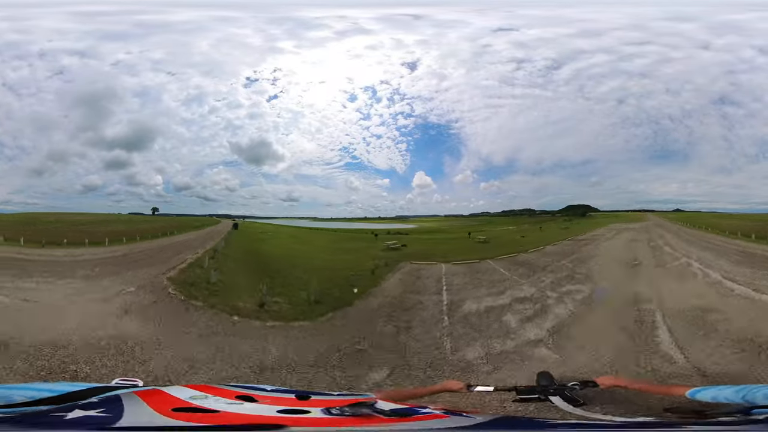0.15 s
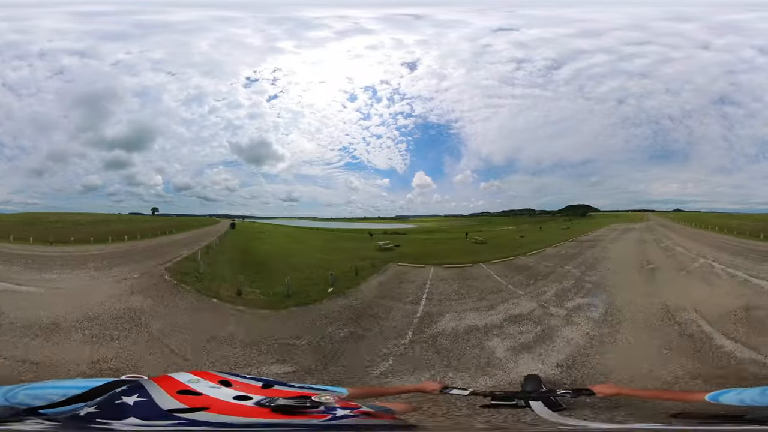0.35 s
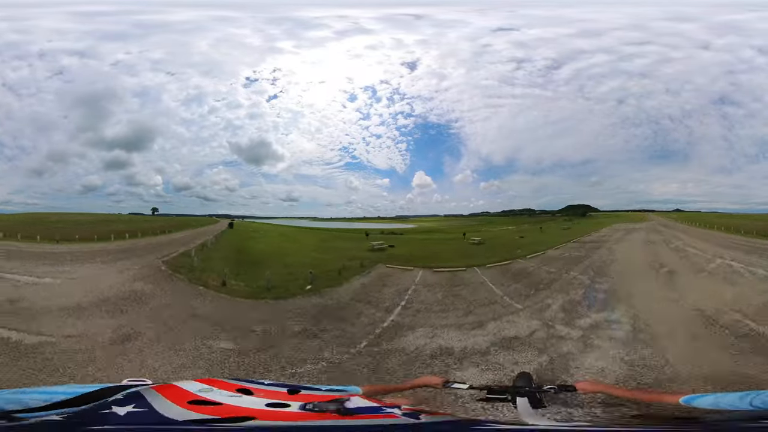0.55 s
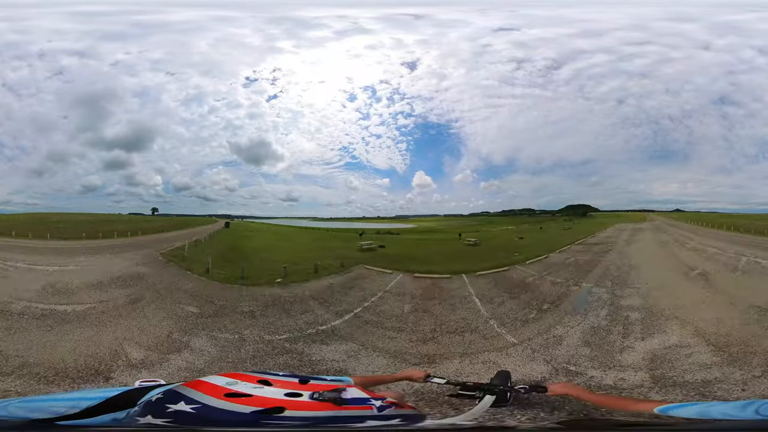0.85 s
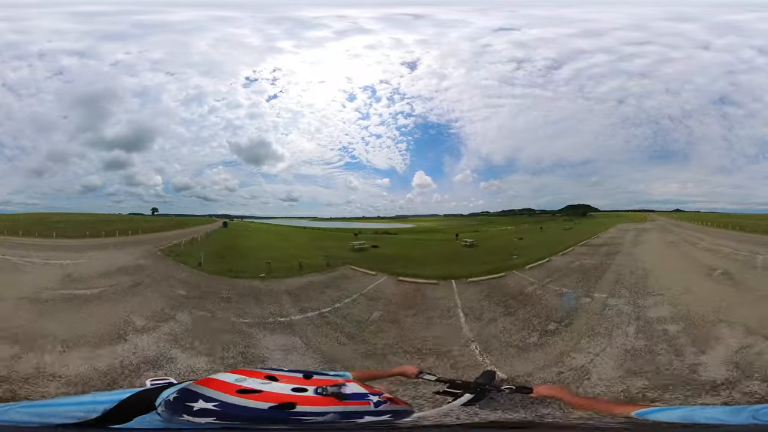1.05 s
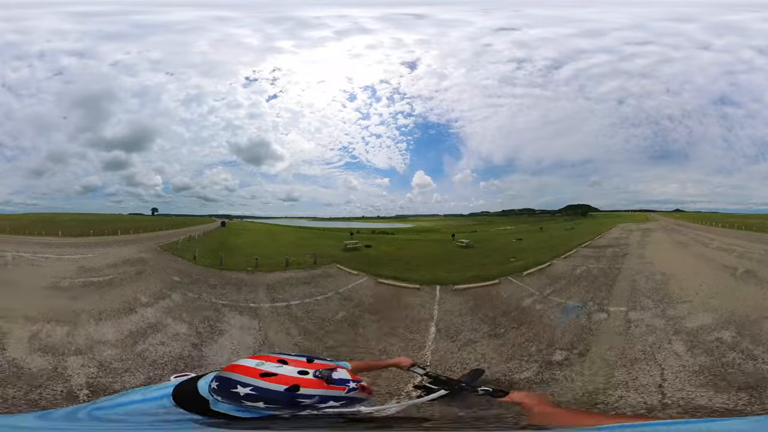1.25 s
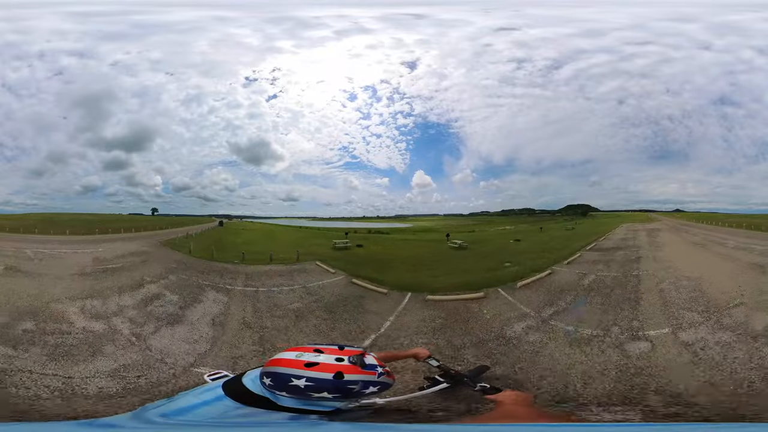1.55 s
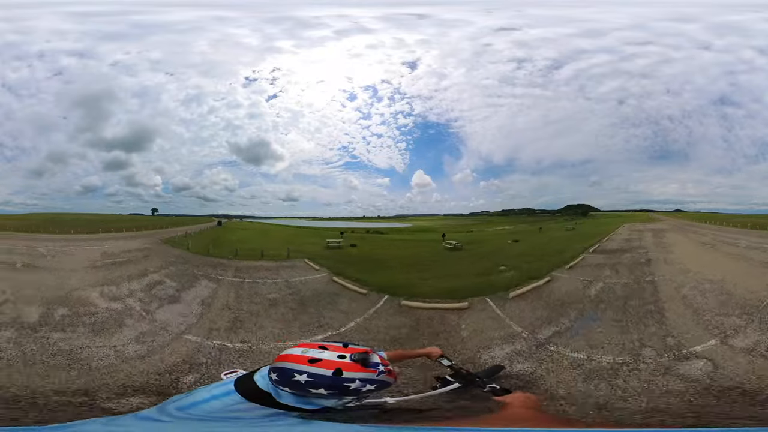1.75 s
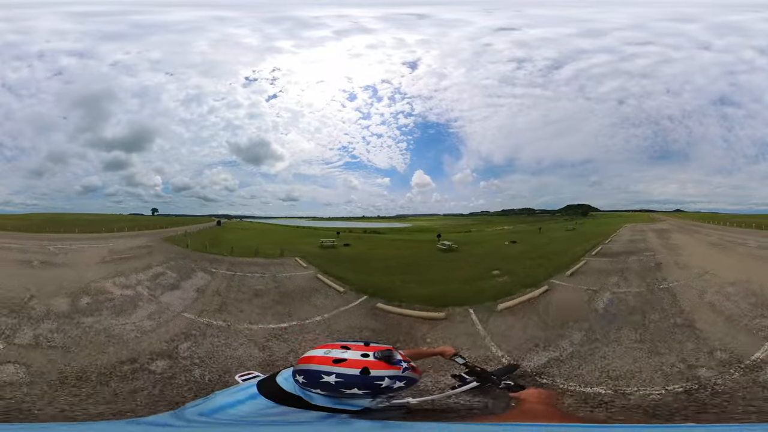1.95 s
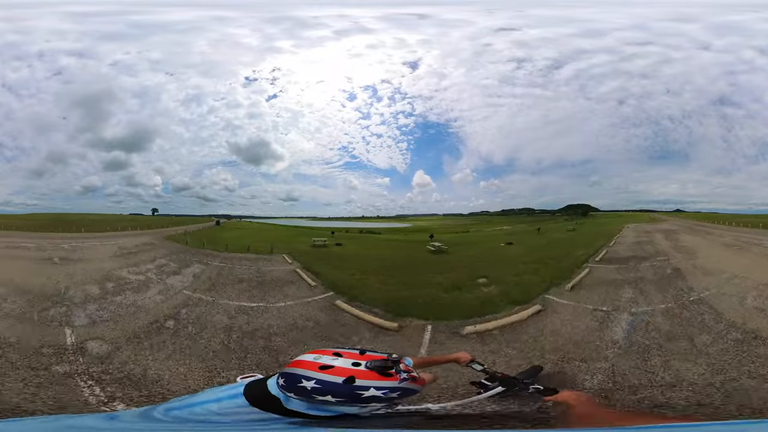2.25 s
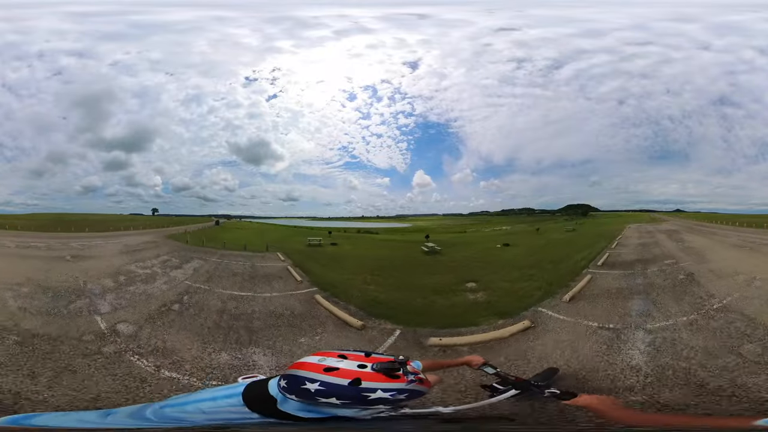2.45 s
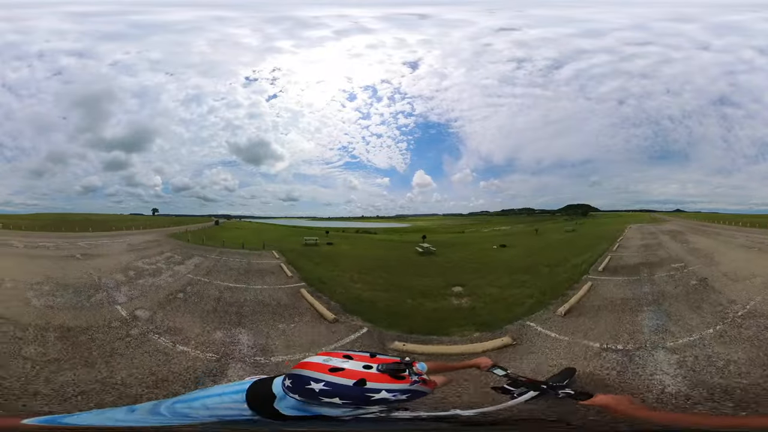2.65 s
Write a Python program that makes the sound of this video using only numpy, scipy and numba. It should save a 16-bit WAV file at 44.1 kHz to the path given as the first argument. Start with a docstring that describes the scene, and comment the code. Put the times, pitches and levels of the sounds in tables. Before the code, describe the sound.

Electric scooter on gravel: low muffled thumps, crunching, hard stone knocks, and a high throbbing brake squeal

```python
"""Electric scooter on rough gravel

An electric scooter rolls over gravel, heard from inside a closed camera case on a pole fixed to it.
Bumps are soft pushes that ring the frame low down; random clicks crackle as gravel; stones ring the case.
A dragging brake, made of noise through narrow filters, squeals high at the start and the end, throbbing
as it grips. A lower wavering tone whistles with it at first, and a motor whines faintly.
"""
import sys
import numpy as np
from scipy import signal
from scipy.fft import rfft, irfft
from scipy.io import wavfile
from scipy.ndimage import uniform_filter1d
from numba import njit

SR = 44100
rng = np.random.default_rng(int(sys.argv[2]) if len(sys.argv) > 2 else 0)


def linear_from_db(decibels):
    """Turn decibels (scalar or array-like) into linear amplitude factors; 0 gives 1."""
    return 10 ** (np.asarray(decibels, float) / 20)


def output_pcm(signal):
    """Save a mono or channel-first signal as 16-bit PCM at the path in sys.argv[1].

    Samples are clipped to [-1, 1] before scaling.
    """
    pcm = np.clip(np.atleast_2d(signal).T, -1, 1) * 32767
    wavfile.write(sys.argv[1], SR, np.round(pcm).astype(np.int16))


N = 123479  # length in samples, 2.8 s

# In the tables, "relative" levels are shifted again where they are used.
# low shaking of the frame: start_s, relative level_db, centre_hz
FRAME_SHAKE = [(0.0, -21.5, 140), (0.08, -34.5, 150.4), (0.15, -16.5, 162), (0.21, -18, 147.5),
               (0.26, -25, 182), (0.28, -18.5, 190), (0.33, -20, 148), (0.37, -20.5, 169),
               (0.49, -20.5, 192), (0.52, -25.5, 160.5), (0.58, -15.5, 205), (0.61, -19, 176),
               (0.65, -15, 162.4), (0.69, -27.5, 183.5), (0.73, -20, 157), (0.82, -22, 178),
               (0.83, -28, 178), (0.87, -28.5, 135), (1.0, -15, 176.7), (1.02, -21.5, 168),
               (1.07, -17, 165), (1.13, -29, 162), (1.24, -20.5, 192.2), (1.27, -40, 174), (1.32, -19, 154),
               (1.36, -44.5, 147), (1.43, -20, 152), (1.48, -39, 146), (1.56, -20.5, 155),
               (1.6, -42, 133.4), (1.64, -29.5, 155.5), (1.71, -31, 142), (1.81, -22.5, 163),
               (1.85, -39, 153.4), (1.91, -20, 166), (1.96, -34, 169), (2.02, -18, 151.4),
               (2.12, -31.5, 129.6), (2.31, -21, 159.3), (2.34, -37.5, 141.4), (2.46, -31.5, 172),
               (2.54, -34.5, 138.6), (2.56, -18, 138.3), (2.59, -37, 155), (2.73, -33.5, 149),
               (2.8, -35, 148.6)]
# higher rattle of the frame: start_s, relative level_db
FRAME_RATTLE = [(0.0, -51), (0.08, -42), (0.16, -60), (0.19, -32.5), (0.39, -25.5), (0.54, -35),
                (0.58, -17.5), (0.72, -26), (0.74, -54), (0.79, -30.5), (0.93, -37), (0.99, -18),
                (1.08, -46.5), (1.13, -50), (1.18, -31.5), (1.24, -33), (1.27, -39), (1.32, -31),
                (1.39, -43), (1.43, -22.5), (1.46, -31.5), (1.74, -46), (1.79, -32), (1.85, -65),
                (2.03, -46), (2.11, -40), (2.3, -35.5), (2.33, -42), (2.59, -42), (2.8, -66)]
# deep rumble: start_s, relative level_db
RUMBLE_LEVEL = [(0.0, -8.5), (0.05, -51), (0.17, -19.5), (0.26, -32), (0.49, -31), (0.51, -33.5),
                (0.6, -23.5), (0.68, -37), (0.77, -30), (0.91, -26), (1.04, -23.5), (1.14, -34),
                (1.17, -25), (1.19, -20), (1.22, -37), (1.25, -30.5), (1.28, -39), (1.32, -25), (1.36, -33),
                (1.56, -26.5), (1.69, -45.5), (1.71, -27.5), (1.81, -27.5), (1.84, -37), (2.04, -30),
                (2.06, -35), (2.19, -28.5), (2.21, -31), (2.31, -23), (2.4, -42.5), (2.48, -31.5),
                (2.56, -24.5), (2.66, -31.5), (2.71, -24.5), (2.78, -36), (2.8, -24.5)]
# tone colour of the rumble: freq_hz, gain_db
RUMBLE_COLOUR = [(12, -37), (20, -6.5), (43, -7.5), (110, -8.5), (140, -24), (240, -120)]
# rolling crunch of the gravel: start_s, relative level_db
CRUNCH_LEVEL = [(0.0, -35), (0.18, -39.5), (0.94, -41), (1.53, -36.5), (2.18, -37.5), (2.5, -39.5),
                (2.8, -37.5)]
# tone colour of the crunch: freq_hz, gain_db
CRUNCH_COLOUR = [(190, -32), (330, -2), (431, 3.5), (469, -6.5), (519, 1.5), (574, -3), (887, 1), (1040, 0),
                 (1540, -20.5), (2380, -31), (3000, -45.5), (3900, -62), (6600, -120)]
# faint treble grit: start_s, relative level_db
GRIT_LEVEL = [(0.02, -58), (0.21, -62.5), (0.29, -59), (0.3, -61), (0.39, -67), (0.65, -62.5),
              (0.88, -64.5), (0.96, -62.5), (1.0, -66), (1.01, -63), (1.06, -66), (1.16, -61.5),
              (1.24, -67.5), (1.33, -60), (1.4, -65.5), (1.52, -58.5), (1.86, -61), (1.88, -50.5),
              (1.91, -56.5), (2.43, -59.5), (2.44, -55), (2.56, -60.5), (2.72, -59), (2.78, -60.5)]
# tone colour of the grit: freq_hz, gain_db
GRIT_COLOUR = [(1060, -2), (1800, -16.5), (2050, -9), (2390, -9), (2810, -12.5), (3180, -14), (3880, -11),
               (5080, -15), (6190, -11.5), (7220, -11.5), (7880, -10), (8540, -11.5), (10300, -18.5),
               (13400, -27.5), (22000, -120)]
# brake squeal, one list for each of two squeals: start_s, level_db
SQUEAL_LEVEL = [
    [(0.0, -10), (0.006, -47), (0.014, -32), (0.036, -61), (0.048, -28), (0.058, -27), (0.086, -40),
     (0.098, -29), (0.132, -52), (0.202, -38), (0.218, -43.5), (0.25, -43), (0.288, -59), (0.332, -51.5),
     (0.368, -71), (0.382, -57), (0.46, -71.5)],
    [(2.068, -62), (2.126, -25.5), (2.154, -35), (2.166, -25.5), (2.18, -21), (2.198, -36), (2.226, -24.5),
     (2.254, -33), (2.26, -23.5), (2.278, -33), (2.292, -22), (2.312, -40), (2.316, -32.5), (2.34, -32.5),
     (2.37, -23.5), (2.428, -38), (2.44, -19.5), (2.454, -29.5), (2.478, -27.5), (2.488, -25), (2.51, -23),
     (2.522, -31), (2.558, -27), (2.582, -33), (2.63, -19.5), (2.66, -44), (2.678, -26), (2.722, -37),
     (2.73, -28), (2.746, -42), (2.758, -36.5), (2.8, -64)],
]
# middle pitch of each squeal: start_s, pitch_hz
SQUEAL_PITCH = [
    [(0, 8500), (.05, 8320), (.1, 8340), (.17, 8400), (.2, 8240), (.25, 8093), (.33, 8040), (.4, 8550),
     (.46, 8260)],
    [(2.05, 8252.5), (2.12, 8230), (2.17, 8296), (2.3, 8150), (2.38, 8210), (2.43, 8470), (2.462, 8460),
     (2.47, 9400), (2.5, 9480), (2.62, 9693), (2.69, 9640), (2.74, 9423), (2.8, 9000)],
]
# filter width of each squeal: width_hz
SQUEAL_WIDTH = (560, 500)
# second brake pad mode, one list for each squeal: start_s, relative level_db
UPPER_LEVEL = [
    [(0.0, -49.5), (0.034, -58), (0.044, -39), (0.07, -51), (0.094, -46), (0.122, -54), (0.184, -36.5),
     (0.23, -74), (0.24, -78.5)],
    [(2.06, -70), (2.068, -74), (2.086, -56), (2.112, -60), (2.148, -38), (2.166, -56), (2.188, -67),
     (2.2, -38), (2.24, -65)],
]
# low brake whistle: start_s, middle pitch_hz, relative level_db
WHISTLE_PATH = [(0, 1425, -42.5), (.036, 1447, -33), (.052, 1343, -39), (.06, 1412, -48), (.075, 1410, -41),
                (.09, 1401, -52), (.11, 1403, -44), (.126, 1403, -58), (.157, 1435, -43), (.172, 1435, -57),
                (.185, 1432, -46), (.205, 1450, -56), (.245, 1484, -57), (.26, 1479, -35.5),
                (.292, 1479, -37), (.312, 1485, -43.5), (.33, 1490, -52.5), (.37, 1496, -80)]
# thin ticks of flying grit: start_s, peak_db
GRIT_TICKS = [(0.041, -61), (0.1496, -60), (0.1865, -61), (0.2044, -47.5), (0.2384, -65), (0.8225, -47),
              (1.587, -60.5), (1.6756, -47), (1.808, -65.5), (1.8622, -57), (1.883, -53), (1.9275, -54.5),
              (2.0004, -57)]
# small stones cracking: start_s, peak_db
STONE_CRACKS = [(0.0617, -51), (0.1138, -45), (0.2099, -47), (0.2832, -39), (0.3082, -51), (0.4887, -56),
                (0.9553, -40.5), (1.0117, -40), (1.105, -55), (1.1898, -47), (1.3089, -47.5), (1.3688, -50),
                (1.459, -45), (1.514, -48), (1.5353, -46.5), (1.5873, -40), (1.747, -44), (1.769, -48),
                (1.8766, -35), (2.0293, -52), (2.2283, -56), (2.2657, -40), (2.314, -50), (2.3706, -45),
                (2.4394, -40.5), (2.65, -44), (2.6953, -42), (2.7137, -46), (2.7263, -33.5), (2.7703, -46)]
# stones knocking the camera case: start_s, peak_db, dull_share_db (extra level of the lowest case mode)
STONE_KNOCKS = [(0.115, -16.5, 14), (0.238, -23, -3), (0.259, -15.5, 3), (0.284, -25, 2), (0.488, -23, -6),
                (0.58, -26, -2), (0.625, -20, -1), (0.959, -17.5, -7.5), (1.012, -10.5, -22),
                (1.105, -21, -3), (1.19, -17, -5), (1.475, -14, -23), (1.514, -17, -3), (1.535, -8.5, 7),
                (1.554, -21, -2), (1.598, -25.5, -12), (1.653, -21, 5), (1.767, -20.5, -12),
                (1.814, -23.5, -14), (1.874, -30, -6), (1.883, -13, -14), (1.906, -22, -10),
                (1.985, -21.5, -8), (2.03, -18.5, -28), (2.184, -28, -8), (2.266, -20.5, 1),
                (2.288, -20.5, -2), (2.293, -20.5, 0), (2.316, -25.5, -3), (2.323, -44, -1),
                (2.349, -22.5, -15), (2.371, -29, -1), (2.404, -24, 10), (2.439, -19.5, 6),
                (2.511, -35, -6), (2.601, -39, -8), (2.65, -31, -2), (2.714, -22, 4), (2.727, -22.5, -17),
                (2.755, -21.5, 6), (2.791, -21.5, -17)]
# typical ring of the case, varied a little at each knock: pitch_hz, level_db, t60_s (time to fade by 60 dB)
CASE_MODES = [(560, -1.5, 0.02), (839, 5, 0.011), (960, 5, 0.014), (1234, -25, 0.013)]
# low thumps of the frame, strong and weak, with two longer faint rings near the end:
# middle_s, peak_db, pitch_hz, length_s (before a small addition)
FRAME_THUMPS = [(0.142, -16.5, 218, 0.01), (0.161, -10, 164, 0.0043), (0.191, -19, 137, 0.016),
                (0.216, -18, 181, 0.0024), (0.286, -11.5, 207.4, 0.0079), (0.322, -6, 170.4, 0.0038),
                (0.351, -14, 171, 0.0022), (0.375, -8, 219, 0.0036), (0.412, -6, 176, 0.0024),
                (0.451, -19, 213, 0.0037), (0.48, -12, 203, 0.0097), (0.575, -12.5, 243, 0.0017),
                (0.598, -20, 185, 0.0049), (0.624, -26, 176, 0.0042), (0.656, -12.5, 165, 0.016),
                (0.704, -12.5, 232, 0.0043), (0.731, -11.5, 175, 0.014), (0.755, -10.5, 145, 0.0084),
                (0.786, -14, 204, 0.018), (0.835, -9.5, 228, 0.0032), (0.892, -18, 125, 0.014),
                (0.922, -13.5, 150, 0.0029), (0.975, -14.5, 184, 0.0035), (1.0, -12.5, 186, 0.0034),
                (1.036, -17, 200, 0.0038), (1.058, -23.5, 153, 0.012), (1.077, -11.5, 193, 0.0098),
                (1.178, -11.5, 177, 0.0042), (1.21, -13.0, 175, 0.018), (1.236, -7.5, 194, 0.0098),
                (1.435, -8.5, 210, 0.0014), (2.019, -9.5, 179, 0.0052), (2.296, -10, 185, 0.0022),
                (2.567, -13, 140, 0.009), (2.628, -21, 154, 0.04), (2.682, -21.5, 166, 0.03)]
# faint motor whine: start_s, relative level_db
WHINE_LEVEL = [(0.5, -87), (0.58, -67), (0.65, -76), (0.8, -74), (0.92, -61), (1.0, -73), (1.14, -74.5),
               (1.28, -81), (1.32, -63), (1.39, -75), (1.88, -69), (2.56, -84), (2.71, -64), (2.8, -70)]
# faint light rub of the brake pad: start_s, relative level_db
RUB_LEVEL = [(1.25, -85), (1.328, -60), (1.414, -78), (1.442, -56), (1.458, -75), (1.65, -69), (1.706, -55),
             (1.73, -63), (1.80, -60), (1.83, -65), (1.856, -53), (1.89, -70), (1.916, -54), (1.935, -66),
             (2.018, -61), (2.042, -68), (2.06, -59), (2.092, -66), (2.118, -50), (2.146, -62),
             (2.168, -58), (2.248, -70), (2.282, -60), (2.35, -72)]


@njit
def svf(x, hz, width):
    """Band-pass filter whose centre can move, with gain 1 at the centre."""
    y, band, low = np.empty(len(x)), 0., 0.
    for i in range(len(x)):
        g, k = np.tan(np.pi * hz[i] / SR), width / hz[i]
        v = (band + g * (x[i] - low)) / (1 + g * (g + k))
        band, low, y[i] = 2 * v - band, low + 2 * g * v, k * v
    return y


def unit(x):
    """Scale to an rms level of 1."""
    return x / np.sqrt(np.mean(x ** 2))


def curve(rows, axis, outside=None):
    """Draw straight lines through one table column; the end values hold unless outside is given."""
    rows = np.array(rows)
    return np.interp(np.arange(N) / SR, rows[:, 0], rows[:, axis], left=outside, right=outside)


def steep(x, hz, width):
    """Pass a sound through the same resonance twice, then level it to rms 1."""
    hz = hz * np.ones(len(x))
    once = svf(x, hz, float(width))
    return unit(svf(once, hz, float(width)))


def colour(x, points):
    """Shape the tone by (Hz, dB) points with a filter that never rings ahead of the sound."""
    points, size = np.array(points), 8192
    f = np.maximum(np.fft.rfftfreq(size, 1 / SR), 1)
    db = np.interp(np.log(f), np.log(points[:, 0]), points[:, 1])
    # Folding the cepstrum forward gives a minimum-phase filter.
    cepstrum = irfft(db * np.log(10) / 20)
    cepstrum[1:size // 2] *= 2
    cepstrum[size // 2 + 1:] = 0
    response = irfft(np.exp(rfft(cepstrum)))
    return unit(signal.fftconvolve(x, response)[:N])


def walk(rate):
    """Smooth random wandering: levels held for 1 / rate seconds, then averaged twice."""
    k = int(SR / rate)
    held = np.repeat(rng.standard_normal(N // k + 1), k)
    smooth = uniform_filter1d(uniform_filter1d(held, k), k)
    return unit(smooth[:N])


def grains(rate, spread_db, hiss):
    """Random clicks of very uneven size, about rate per second, over some plain noise."""
    chance = rng.random((N, 3))
    size_db = np.minimum(-spread_db * np.log(chance[:, 1] + 1e-9), 4 * spread_db)
    size = linear_from_db(size_db) * np.sign(chance[:, 2] - .5)
    clicks = (chance[:, 0] < rate / SR) * size
    return unit(clicks) + hiss * rng.standard_normal(N)


def patchy(x, patchy_db):
    """Let third-octave bands from 1500 Hz up swell and fade each on their own."""
    spec = rfft(x)
    octaves = np.log2(np.maximum(np.fft.rfftfreq(N, 1 / SR), 1) / 1500)
    place = np.clip(3 * octaves, 0, 10)
    out = 0
    for k in range(11):
        share = np.maximum(1 - np.abs(place - k), 0)
        out = out + irfft(spec * share, N) * linear_from_db(patchy_db * walk(14))
    return unit(out)


def snaps(rows, decay_s, hz, width):
    """Very short fading noise bursts through a broad resonance, each set to its peak level."""
    out, t = np.zeros(N + 400), np.arange(400) / SR
    centre = np.full(len(t), float(hz))
    noises = rng.standard_normal((len(rows), len(t)))
    for (start_s, peak_db), noise in zip(rows, noises):
        burst = svf(noise * np.exp(-t / decay_s), centre, float(width))
        burst = svf(burst, centre, float(width))
        first = int(start_s * SR)
        out[first:first + len(t)] += linear_from_db(peak_db) * burst / np.abs(burst).max()
    return out[:N]


def soft_bumps():
    """A tyre softens each random bump into a short rounded push."""
    push = np.hanning(int(0.00088 * SR))  # length in seconds times SR
    bumps = grains(75, spread_db=2.0, hiss=0.71)  # bumps per second
    return np.convolve(bumps, push, "same")


def frame_shake():
    """Soft bumps ring the frame for a few cycles at a low, moving pitch."""
    shake = steep(soft_bumps(), curve(FRAME_SHAKE, axis=2), width=127)
    return shake * linear_from_db(curve(FRAME_SHAKE, axis=1) - 1.5)


def frame_rattle():
    """Other soft bumps ring two higher resonances of the frame."""
    jolts, centre_hz = soft_bumps(), 316
    lower = steep(jolts, centre_hz, width=207)
    upper = steep(jolts, 1.526 * centre_hz, width=51)
    return unit(lower + 0.36 * upper) * linear_from_db(curve(FRAME_RATTLE, axis=1) - 5)


def deep_rumble():
    """Noise kept to the bass rumbles below the shaking and swells unevenly."""
    rumble = colour(rng.standard_normal(N), RUMBLE_COLOUR) * linear_from_db(1.2 * walk(12))
    return unit(rumble) * linear_from_db(curve(RUMBLE_LEVEL, axis=1) + 1.45)


def gravel_crunch():
    """Many pebbles crackle under the tyres as uneven clicks."""
    rough = linear_from_db(1.4 * walk(29.69))
    pebbles = grains(700, spread_db=3.0, hiss=0.5)  # pebbles per second
    return colour(pebbles * rough, CRUNCH_COLOUR) * linear_from_db(curve(CRUNCH_LEVEL, axis=1) + 1)


def treble_grit():
    """Fine specks hiss faintly above the crunch, flickering band by band."""
    flicker = linear_from_db(1.6 * walk(70))
    specks = grains(760, spread_db=2.5, hiss=1.1)  # specks per second
    grit = patchy(colour(specks * flicker, GRIT_COLOUR), patchy_db=1.7)
    return grit * linear_from_db(curve(GRIT_LEVEL, axis=1) + 4)


def brake_squeal():
    """Friction noise sings in a narrow mode of the brake pad, with rough flecks just below."""
    out = 0
    for pitch, level, width in zip(SQUEAL_PITCH, SQUEAL_LEVEL, SQUEAL_WIDTH):
        hz = curve(pitch, axis=1) * (1 + .0055 * walk(160))
        sing = steep(steep(rng.standard_normal(N), hz, width), hz, width)
        flecks = steep(rng.standard_normal(N), .95 * hz, 1.6 * width) * linear_from_db(5 * walk(45) - 29)
        voice = unit(sing * linear_from_db(1.8 * walk(300)) + flecks)
        out = out + voice * linear_from_db(curve(level, axis=1, outside=-120))
    return out


def upper_squeal():
    """Friction noise also sings in a second pad mode at 9100 Hz."""
    out = 0
    for level in UPPER_LEVEL:
        sing = steep(rng.standard_normal(N), 9100, width=480)
        out = out + sing * linear_from_db(curve(level, axis=1, outside=-120) - 7.5)
    return out


def brake_whistle():
    """A wavering sine tone, roughened by narrow noise at its pitch and at two faint overtones."""
    hz = curve(WHISTLE_PATH, axis=1)
    phase = 2 * np.pi * np.cumsum(hz * (1 + .006 * walk(60))) / SR
    tone = np.sin(phase)
    for multiple, db in ((2, -27.5), (3, -37.5)):
        tone = tone + linear_from_db(db) * steep(rng.standard_normal(N), multiple * hz, width=150)
    tone = tone + .35 * steep(rng.standard_normal(N), hz, width=90)
    return 1.03 * tone * linear_from_db(curve(WHISTLE_PATH, axis=2, outside=-120) + 2.2 * walk(60))


def grit_ticks():
    """Flying grit makes thin high ticks: tiny noise bursts around 10 kHz."""
    return snaps(GRIT_TICKS, 0.0023, hz=10000, width=11000)


def stone_cracks():
    """Small stones crack as tiny noise bursts around 1880 Hz."""
    return snaps(STONE_CRACKS, 0.0021, hz=1880, width=990)


def stone_knocks():
    """Each stone rings the modes of the case afresh, as sine tones that die away."""
    out, t = np.zeros(N + 4000), np.arange(4000) / SR
    rise_s = .0013
    rise = 1 - np.exp(-(t / rise_s) ** 2)
    chance = rng.standard_normal((len(STONE_KNOCKS), len(CASE_MODES), 2))
    for (start_s, peak_db, dull_db), knock_chance in zip(STONE_KNOCKS, chance):
        ring = np.zeros(len(t))
        for k, (hz, db, t60) in enumerate(CASE_MODES):
            level_chance, pitch_chance = knock_chance[k]
            mode_db = db + 0.61 * level_chance + (dull_db if k == 0 else 0)
            mode_hz = hz * (1 + 0.051 * pitch_chance)
            fade = np.exp(-np.log(1000) * t / t60)
            ring += linear_from_db(mode_db) * fade * np.sin(2 * np.pi * mode_hz * (t - rise_s))
        ring *= rise
        first = int(start_s * SR)
        out[first:first + len(t)] += linear_from_db(peak_db) * ring / np.abs(ring).max()
    return out[:N]


def frame_thumps():
    """Low thumps of the frame, strong and weak: each is a low wave that swells and fades."""
    out, t = np.zeros(N), np.arange(N) / SR
    turns = rng.random(len(FRAME_THUMPS))  # random starting point within the wave
    for (middle_s, peak_db, hz, length_s), turn in zip(FRAME_THUMPS, turns):
        near = slice(int((middle_s - .05) * SR), int((middle_s + .05) * SR))
        u = t[near] - middle_s
        swell = np.exp(-(2 * u / (length_s + 0.0015)) ** 2)
        out[near] += linear_from_db(peak_db) * swell * np.cos(2 * np.pi * (hz * u + turn))
    return out


def motor_whine():
    """Noise in a narrow wandering band makes a thin whine that comes and goes."""
    hz = 3790 * (1 + 0.012 * walk(8))
    whine = steep(rng.standard_normal(N), hz, width=240)
    return whine * linear_from_db(curve(WHINE_LEVEL, axis=1) - 8 + 4 * walk(25))


def pad_rub():
    """The pad rubs lightly: faint noise in a narrow wandering band."""
    hz = 7120 * (1 + .008 * walk(15))
    rub = steep(rng.standard_normal(N), hz, width=240)
    return rub * linear_from_db(curve(RUB_LEVEL, axis=1, outside=-120) - 2.5 + 2 * walk(40))


def scene():
    """Add all sources at one microphone."""
    frame = frame_shake() + frame_rattle() + deep_rumble()
    gravel = gravel_crunch() + treble_grit()
    brake = brake_squeal() + upper_squeal() + brake_whistle()
    stones = grit_ticks() + stone_cracks() + stone_knocks()
    mix = frame + gravel + brake + stones + frame_thumps() + motor_whine() + pad_rub()
    return mix[None, :]


def band_limit(x):
    """A steep low-pass at the top of the band."""
    return signal.sosfilt(signal.butter(12, 14300, fs=SR, output="sos"), x)


def record(dry):
    """The camera cuts the deepest bass and rounds the peaks."""
    bass_cut = signal.butter(2, 38, "high", fs=SR, output="sos")  # corner in Hz
    cut = signal.sosfilt(bass_cut, dry)
    rounded = np.tanh(1.3 * cut) / 1.3
    return band_limit(rounded)


dry = scene()
out = record(dry)
output_pcm(out)
```